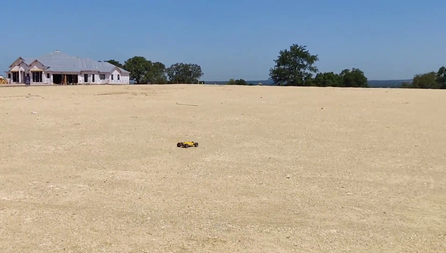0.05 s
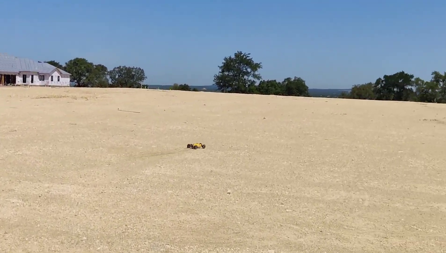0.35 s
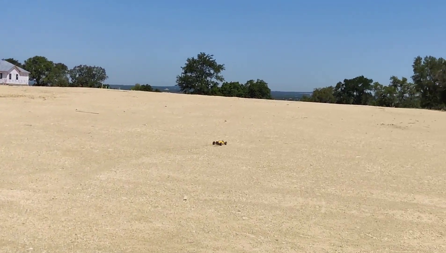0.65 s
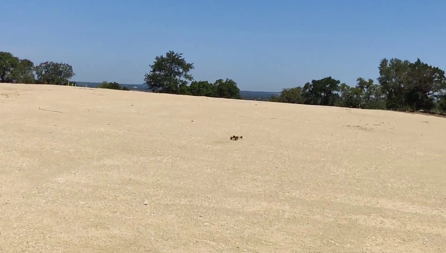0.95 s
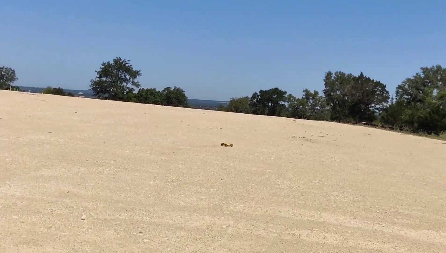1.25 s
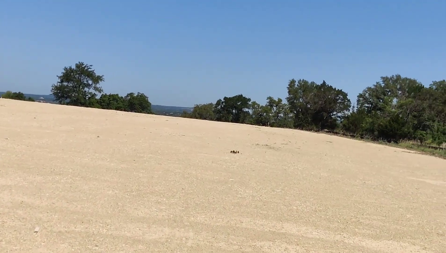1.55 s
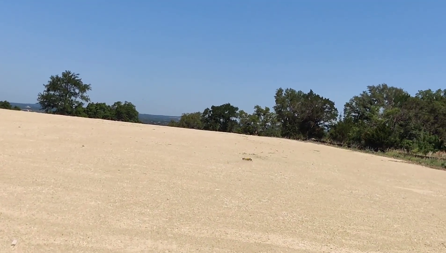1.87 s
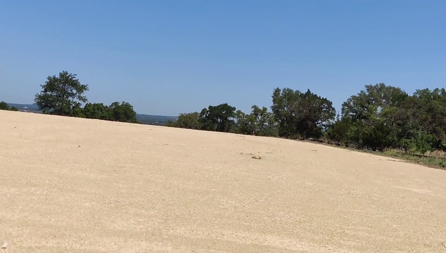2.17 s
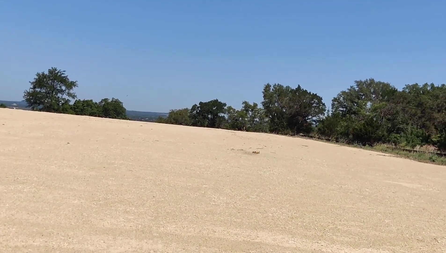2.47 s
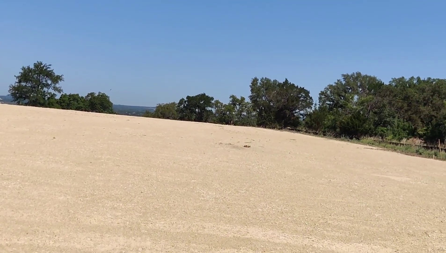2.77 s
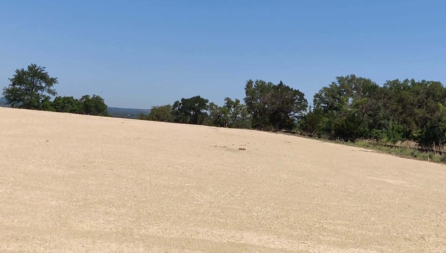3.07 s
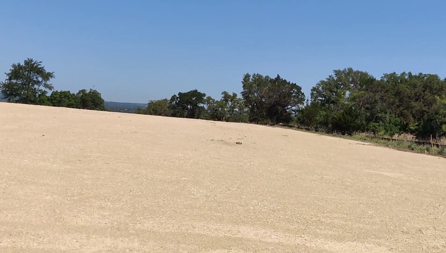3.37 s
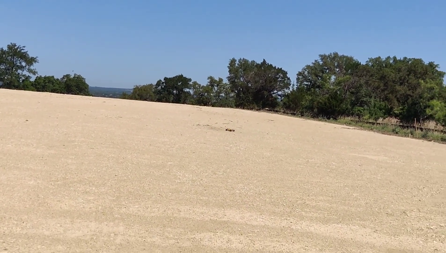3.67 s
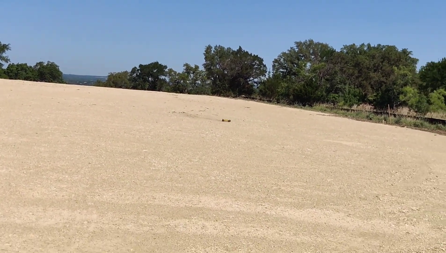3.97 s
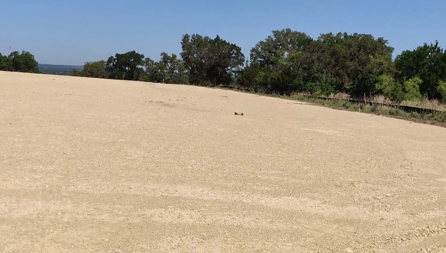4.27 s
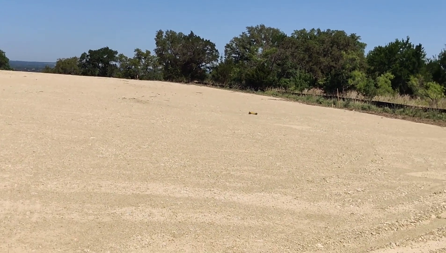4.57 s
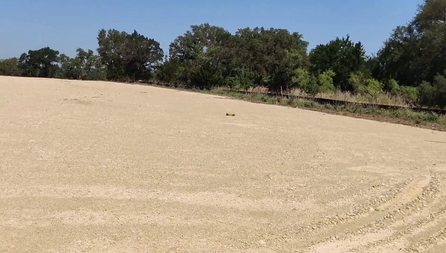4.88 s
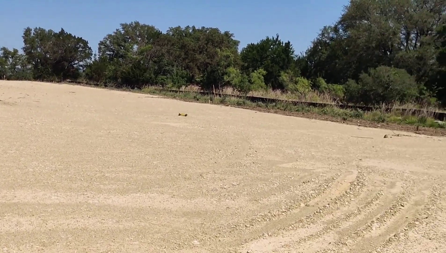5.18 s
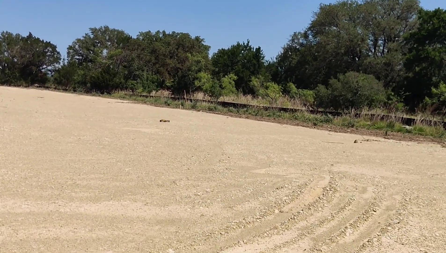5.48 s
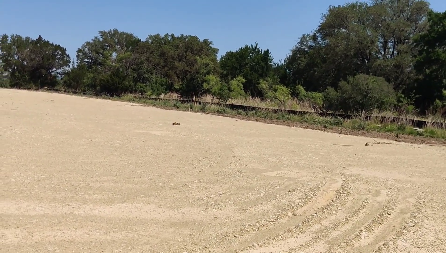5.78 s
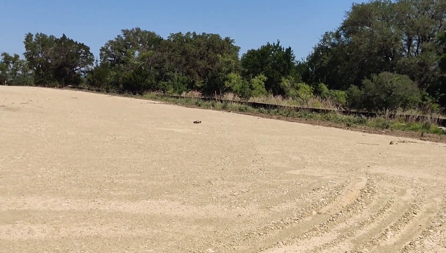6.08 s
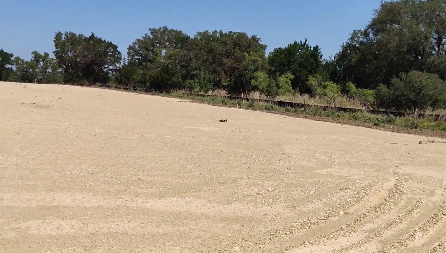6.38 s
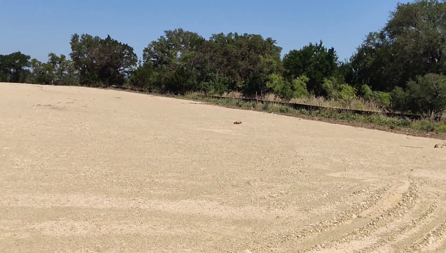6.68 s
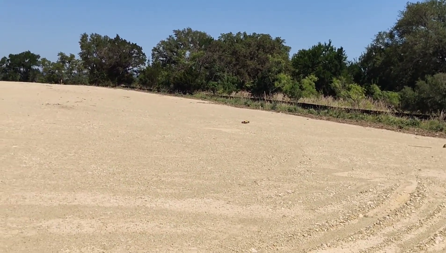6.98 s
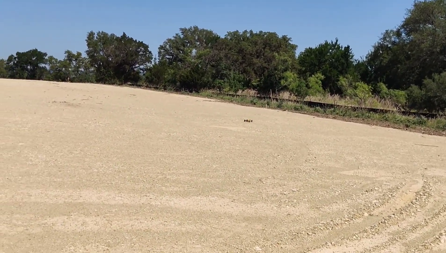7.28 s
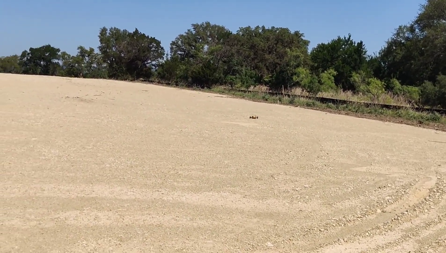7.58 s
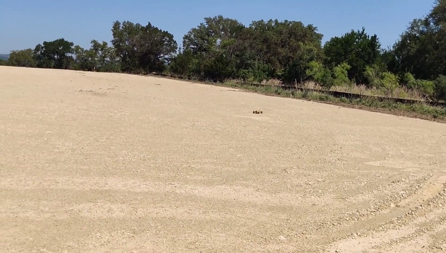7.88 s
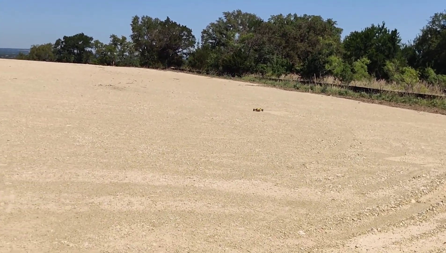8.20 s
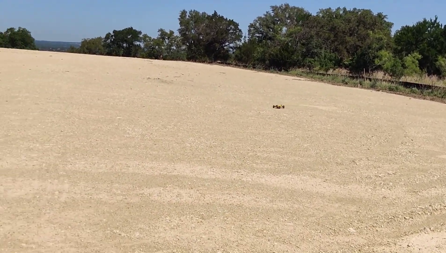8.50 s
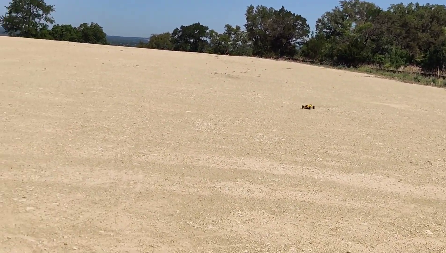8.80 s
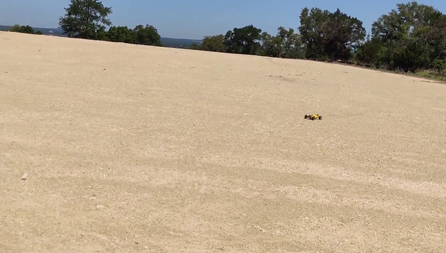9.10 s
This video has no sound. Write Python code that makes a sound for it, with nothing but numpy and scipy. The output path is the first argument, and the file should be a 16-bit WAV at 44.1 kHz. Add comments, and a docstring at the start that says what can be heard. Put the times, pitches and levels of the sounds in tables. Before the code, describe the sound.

Outdoors, wind buffets the microphone and a distant engine hums while a little electric toy car grinds over loose gravel. Sand hisses and stones tick at first, mixed with drivetrain chatter, then the car recedes into quieter spurts and soft scuffs. A loud, sharp clack stands out around the middle. After a lull and three faint bird chirps, the tyres crunch steadily louder as the car returns.

```python
"""A small electric toy car drives off over a gravel lot and comes back. From the start its tyres grind
stones in long swells and short spurts, its drivetrain chatters with speed and its colour shifts with
its bearing; wind rumbles on the microphone ports and a far engine swells in. Sand fizzes for the first
second or so; stones snap free and dull scuffs fall. From 2 s come sharp clacks, loudest at 5 s.
Near 7 s a far bird chirps three times, then the grinding builds again."""
import sys
import numpy as np
from scipy import signal
from scipy.fft import rfft, irfft, next_fast_len
from scipy.io import wavfile
from scipy.ndimage import uniform_filter1d, map_coordinates

SR = 44100
rng = np.random.default_rng(int(sys.argv[2]) if len(sys.argv) > 2 else 0)


def dump(signal):
    """Clip the signal to [-1, 1] and save it as 16-bit WAV at the path in sys.argv[1]."""
    limited = np.clip(np.atleast_2d(signal).T, -1, 1)
    pcm = np.round(limited * 32767).astype(np.int16)
    wavfile.write(sys.argv[1], SR, pcm)


N = 407904

# Tyre grinds. Each row: start of hold in seconds, attack, hold and release in seconds, relative crunch
# level in dB, change over the hold in dB, body and grit over crunch in dB.
TYRE_GRINDS = [(.01, 0.096, 0.14, 0.29, -44.5, -3.5, -2.5, 7.5),
               (0.29, 0.34, 0.52, 0.39, -31, -5.5, -10, 6.5), (1.067, 1, 0.23, 0.14, -37.5, -3, -5, 5),
               (1.405, 0.059, 0.097, 0.099, -50, -6, 1, -6.5),
               (1.505, 0.051, 0.036, 0.062, -47, 1, -8, 2.5), (1.634, 0.062, 0.5, 0.4, -47, -7, 0, 0.5),
               (2.247, 0.11, 0.31, 0.17, -58, -1.5, -1, 0.5), (2.619, 0.048, 0.027, 0.1, -56, -1, -4, 2.5),
               (2.713, 0.02, 0.015, 0.019, -54, -0.5, -9, 3),
               (2.767, 0.016, 0.024, 0.16, -57, -1.5, -6.5, 0.5),
               (2.95, 0.12, 0.026, 0.053, -56.5, 3.5, -17.5, 2),
               (3.021, 0.0084, 0.083, 0.037, -47.5, -0.5, -11.5, -1),
               (3.148, 0.018, 0.051, 0.086, -51, 2.5, -20, -0.5),
               (3.25, 0.13, 1.047, 0.2795, -43.5, -1.5, -10.5, 1.5),
               (4.444, 0.22, 0.047, 0.082, -52.5, -6, 2, -4.5),
               (4.549, 0.0095, 0.044, 0.04, -55, -1.5, -5, 1),
               (4.656, 0.029, 0.47, 0.37, -51, -5.5, -4, 1.5),
               (5.348, 0.21, 0.32, 0.12, -66.5, 0.5, -2, -3),
               (5.931, 0.14, 0.035, 0.11, -52, 0.5, -14, 2.5),
               (6.099, 0.11, 0.034, 0.17, -64, -10.5, 0.5, 8),
               (7.16, 0.076, 0.14, 0.22, -42, 3, -14.5, -0.5),
               (7.751, 0.19, 1.435, 0.26, -42.5, 10.5, -14.5, 1)]
# Drivetrain. Each row: time in seconds, knocks per second, power weight against the loose stones.
DRIVETRAIN_KNOCKS = [(0, 60.5, 0.76), (.18, 76.5, 1), (.36, 113, 1), (.52, 116, 0.71), (1.25, 136, 0.42),
                     (1.7, 45, 0.42), (2.9, 38.5, 0.098), (3.25, 66.5, 0.18), (3.55, 79, 0.57),
                     (3.75, 60, 1.6), (4.05, 98, 0.8), (4.5, 59, 1.14), (5.3, 42, 0.11), (7.05, 46.7, 0.37),
                     (7.3, 78, 0.95), (7.5, 49.3, 1.1), (7.85, 57, 1.3), (8.15, 62, 2.2), (8.35, 66, 1.09),
                     (8.55, 91, 0.66), (8.9, 112, 0.75), (9.25, 117, 0.43)]
# Noise colours. Each row: frequency in Hz, relative density in dB.
GRAVEL_SPECTRUM = [(150, -3.5), (300, -4), (600, -4), (1000, -5.5), (1350, -2.5), (2000, -2.5),
                   (3000, -1.5), (4000, 4), (5000, 6), (7000, 1), (10500, 1), (12000, -20), (13500, -0.5),
                   (15200, -14.5)]
SAND_SPECTRUM = [(6000, -48), (10500, -9), (13200, -12.5), (14300, -3.5), (15400, 3.5), (16500, -7.5)]
WIND_SPECTRUM = [(12, -5), (25, 1.5), (45, -0.5), (70, -4.5), (100, -10), (140, -19), (200, -27),
                 (300, -33.5), (450, -51), (900, -68)]
AIR_SPECTRUM = [(200, -1.5), (450, 0.5), (800, 5), (1500, -3.5), (3500, -8), (7200, -18), (14500, -19)]
# Gravel width. Each row: frequency in Hz, left-right correlation.
GRAVEL_CORRELATION = [(300, 0.99), (1500, 0.92), (2700, 1), (4500, 0.84), (6000, 0.64), (8000, 0.63),
                      (15000, 1)]
# Hollow rasp of a heavy grind. Each row: low edge in Hz, high edge in Hz, gain added at full strength.
RASP_BANDS = [(1430, 1804, 0.67), (5740, 7300, 0.19)]
# Side of the car facing the listener. Each row: time in seconds, shares of tail, flank and nose.
SHELL_FACING = [(0, 0.82, 0.46, 0), (1.2, 0.81, 0.29, 0.24), (1.8, 0.4, 0.12, 0), (3.3, 0.34, 0.14, 0.91),
                (3.6, 0.014, 0.97, 0.47), (4.4, 0.036, 1, 0.018), (5.2, 0.21, 0.22, 0.19), (7, 0, 0, 1),
                (7.8, 0, 0.037, 0.94), (8.5, 0, 0.059, 0.83), (9.25, 0.35, 0.059, 0.72)]
# Plastic shell resonances and dips, by side. Each row: centre in Hz, width in Hz, gain in dB.
TAIL_PEAKS = [(2007, 184.8, 8), (2500, 191.0, 3.5), (3480, 174.3, 3.2), (5790, 347.7, 6.4),
              (8384.6, 114.4, 1.5)]
FLANK_PEAKS = [(1040, 500, 5.3), (2160, 125.0, 3.9), (4460, 600, 1.5), (5150, 339.3, 4.3), (6470, 210, 3.5)]
NOSE_PEAKS = [(2900, 250, 4.5), (5030, 470, 4.5), (5146.7, 1400, 0.6), (5300, 210, -9), (7140, 290, -3)]
# Sand spray. Each row: time in seconds, level in dB.
SAND_LEVELS = [(0, -55), (.15, -41), (.35, -39.5), (.6, -53.5), (.9, -44), (1.3, -66), (1.7, -92)]
# Gusts. Each row: time of the top in seconds, length in seconds, relative level in dB.
WIND_GUSTS = [(.25, 0.28, -38), (0.395, 0.19, -32.5), (2.47, 0.048, -38), (3.006, 0.19, -36),
              (3.849, 0.22, -41.5), (4.098, 0.042, -36), (4.99, 0.15, -42.5), (5.563, 0.2, -39),
              (6.039, 0.23, -38.5), (8.357, 0.09, -32), (8.544, 0.11, -34), (9.09, 0.14, -35.5)]
# Far engine. Each row: multiple of the turning rate, level in dB.
ENGINE_HARMONICS = [(4, -56), (5, -54.5), (6, -66.5), (7, -66.5), (8, -67), (10, -71.5)]
# Larger stones snapping free. Each row: start in seconds, relative peak in dB.
STONE_SNAPS = [(0.074, -22.5), (0.104, -19), (0.135, -21), (0.148, -20), (0.262, -15), (0.3403, -14.5),
               (0.367, -12), (0.3843, -14), (0.394, -12), (0.439, -12.5), (0.4794, -20.5), (0.5416, -15),
               (0.7586, -19.5), (1.06, -14), (1.1275, -11.5), (1.3215, -17), (1.42, -28.5), (1.4531, -21),
               (1.464, -21), (1.5055, -24), (1.517, -23), (1.5368, -25), (1.6245, -27.5), (1.647, -31.5),
               (1.8775, -33.5), (1.9511, -26.5), (2.1436, -44.5), (2.345, -42), (2.431, -41.5),
               (2.475, -36), (2.7125, -38), (2.7255, -32.5), (3.024, -31), (3.246, -31), (4.277, -25),
               (4.464, -31.5), (4.481, -39.5), (4.5523, -34.5), (4.573, -39), (4.644, -36), (4.69, -27.5),
               (5.58, -45), (5.622, -43.5), (5.693, -43.5), (5.8046, -41), (5.8115, -40.5), (5.865, -45.5),
               (5.926, -26.5), (5.9323, -30), (5.979, -26), (5.985, -30), (7.0492, -39.5), (7.1703, -29.5),
               (7.3758, -30.5), (7.433, -36.5), (7.472, -39.5), (7.509, -41), (7.554, -43), (7.6, -35.5),
               (7.7967, -24.5), (8.0767, -20.5), (8.279, -24.5)]
# Scuffs in the dirt. Each row: start in seconds, peak before panning in dB, pitch in Hz.
DIRT_SCUFFS = [(0.128, -32.5, 580), (0.145, -33, 590), (2.06, -40.5, 580), (2.297, -46, 917),
               (2.438, -40, 701), (2.449, -40, 877), (2.49, -37.5, 720), (2.783, -48, 960),
               (3.048, -37.5, 760), (3.133, -47, 603), (3.199, -43, 750), (3.434, -32.5, 576),
               (3.4398, -32, 691), (3.4445, -33, 801), (3.45, -35, 510), (3.459, -25, 705),
               (3.463, -33, 616), (5.096, -36.5, 700)]
# Near clacks. Each row: start in seconds, peak before panning in dB, treble and bass weights in dB,
# rub T60 in seconds, pitch ratio.
CLACK_HITS = [(2.146, -35, -34, -25.5, .006, 0.98), (3.1322, -34, -22, -10, 0.0079, 1),
              (3.246, -30.5, -25, -34, .012, 0.94), (4.836, -27, -14, -23, 0.012, 0.91),
              (5.0168, -12, 5, -12, 0.036, 1.015), (5.027, -16, -12.5, -11.5, 0.047, 1),
              (5.032, -18, -6, -10.5, 0.073, 1.07), (5.2057, -28, -13.5, -5.5, 0.033, 0.99),
              (5.256, -34, -4, -2, 0.0047, 1.03), (5.313, -38.5, -26.5, -21, 0.0067, 0.91),
              (6.381, -46.5, -10, -10, 0.099, 1), (6.396, -32.5, -43, -8, 0.038, 1.05),
              (6.406, -36.5, -15, -4, 0.049, 0.93), (6.414, -42, -24, -4, 0.07, 1.05),
              (6.423, -39, -18, 5, 0.047, 0.89)]
# Modes of a clack. Each row: frequency in Hz, relative level in dB, T60 in seconds.
CLACK_RESONANCES = [(818.4, -3, 0.022), (1051, -13, 0.041), (1410, -14.5, 0.0129), (1859, -9.5, 0.01702),
                    (2241, -7, 0.015), (2750, -2.5, 0.0082), (3638, -9.5, 0.019), (4243, 6, 0.0099),
                    (6370, 0.5, 0.016), (7640, -1, 0.0051), (9200, -1.5, 0.0022)]
# Far bird. Each row: mid-note time in seconds, pitch in Hz, peak in dB.
BIRD_CHIRPS = [(6.821, 4040, -70.5), (6.921, 4050, -72.5), (7.03, 4100, -69.5)]
# Microphone casing and port resonances and dips. Each row: centre in Hz, width in Hz, gain in dB.
CASING_PEAKS = [(656, 180, 3.5), (1000, 160, -0.5), (1220, 130, 1), (1340, 150, -5), (1660, 200, 1),
                (1940, 250, -3), (2276, 135, 6), (2800, 67, 1.5), (4200, 150, 1.5), (4410, 770, -4),
                (5930, 200, 1.5), (6230, 220, 0), (6400, 180, 0.5)]
LEFT_PORT_PEAKS = [(300.1, 4200, -3), (1684, 770, 5.5), (4250, 1260, 6), (6740, 1200, -23.5),
                   (7580, 1660, 13.5)]
RIGHT_PORT_PEAKS = [(1692, 380, 4), (2420, 1920, -4), (6568.7, 2100, 15.5), (8215, 3350, -17.5)]
# Car's bearing at the ports. Each row: time in seconds, left lag in samples, left dip in Hz,
# reflection delay in seconds.
BEARING_CUES = [(0.25, -1.5, 4119.39, 0.0022), (0.575, -3.5, 4032.49, 0.0018), (1.025, 0.6, 4000, 0.002),
                (1.95, -0.36, 3940, 0.0018), (3.525, 0.6, 3894, 0.0016), (4.1, -0.8, 3800, 0.0019),
                (4.8, 0.65, 3945, 0.0017), (7.275, 1.4, 3788, 0.0017), (8.0, 1.8, 3686, 0.0018),
                (8.425, 2.5, 3590, 0.0018), (8.75, 4.5, 3498, 0.0019), (9.05, 5, 3474, 0.0019)]
# Reflections off a near surface on the right. Each row: share of the reflection delay, gain.
REFLECTIONS = [(1, .19), (0.674, 0.059)]


def from_db(db):
    """Decibels to gain."""
    return 10 ** (np.asarray(db) / 20)


def unit_rms(x):
    """Scale to unit power."""
    return x / np.sqrt(np.mean(x ** 2) + 1e-20)


def pan_right(x, db):
    """Left down and right up, each by db."""
    return x * from_db([[-db], [db]])


def add(out, start_s, sound):
    """Mix a sound in at a time."""
    i = int(start_s * SR)
    out[..., i:i + sound.shape[-1]] += sound[..., :N - i]


def in_time(rows):
    """Each column of a timed table, per sample."""
    times_s, *columns = np.transpose(rows)
    return [np.interp(np.arange(N) / SR, times_s, column) for column in columns]


def at_hz(points, hz):
    """Interpolate on a log-frequency axis."""
    points_hz, values = np.transpose(points)
    return np.interp(np.log(hz), np.log(points_hz), values)


def drift(knots_per_s):
    """Random wander between knots of spread 1."""
    knots = rng.standard_normal(4000)
    return np.interp(np.arange(N) / SR * knots_per_s, np.arange(len(knots)), knots)


def band(x, low_hz, high_hz):
    """Band-pass."""
    return signal.sosfilt(signal.butter(2, [low_hz, high_hz], "band", fs=SR, output="sos"), x)


def decay(clicks, t60_s):
    """Exponential tail on each click."""
    return signal.lfilter([1], [1, -from_db(-60 / (t60_s * SR))], clicks + 1e-18)


def ring(x, hz, t60_s):
    """One damped mode."""
    r, w = from_db(-60 / (t60_s * SR)), 2 * np.pi * hz / SR
    return signal.lfilter([0, np.sin(w)], [1, -2 * r * np.cos(w), r * r], x + 1e-18)


def peak_filter(hz, width_hz, db):
    """Biquad for one peak or dip."""
    w, a = 2 * np.pi * hz / SR, from_db(db / 2)
    q = np.sin(w) * width_hz / hz / 2
    return [1 + q * a, -2 * np.cos(w), 1 - q * a], [1 + q / a, -2 * np.cos(w), 1 - q / a]


def resonate(x, peaks):
    """Peaks and dips in series."""
    for peak in peaks:
        x = signal.lfilter(*peak_filter(*peak), x)
    return x


def stereo(noises, correlation):
    """Two noises mixed to a correlated left and right."""
    mid = np.sqrt(1 + correlation) * noises[0]
    side = np.sqrt(1 - correlation) * noises[1]
    return np.array([mid + side, mid - side]) / np.sqrt(2)


def steady_noise(spectrum, correlation):
    """Unit-power stereo noise; colour and correlation are given by frequency."""
    size = next_fast_len(N)
    hz = np.arange(size // 2 + 1) * SR / size + 0.00104
    white = rfft(rng.standard_normal((2, size)))
    coloured = stereo(white, at_hz(correlation, hz)) * from_db(at_hz(spectrum, hz))
    return unit_rms(irfft(coloured, size)[:, :N])


def grind_levels_db(edge_db=20, dig_body_db=7, dig_grit_db=2.5, spurts_below_db=-46):
    """Body, crunch and grit: each grind builds, digs in and lets go; light loads move in spurts."""
    t, power = np.arange(N) / SR, 1e-12
    for start_s, attack_s, hold_s, release_s, db, change_db, body_db, grit_db in TYRE_GRINDS:
        progress = np.clip((t - start_s) / hold_s, 0, 1)
        edges = np.maximum(start_s - t, 0) / attack_s + np.maximum(t - start_s - hold_s, 0) / release_s
        crunch_db = db + change_db * progress - edge_db * np.minimum(edges, 10)
        dig = progress - .5
        power = power + from_db([crunch_db + body_db + dig_body_db * dig,
                                 crunch_db,
                                 crunch_db + grit_db + dig_grit_db * dig]) ** 2
    levels_db = 10 * np.log10(power)
    spurt_db = 0.23 * np.clip(spurts_below_db - levels_db[1], 0, 20)
    return levels_db + spurt_db * drift(19)


def drivetrain_chatter(slips_per_s, weight=0.42, spread_db=1.7, rattle_s=.001, touches=4):
    """Energy per sample of the short rattle at each turn of the drivetrain."""
    knocks_per_s, power = in_time(DRIVETRAIN_KNOCKS)
    turns = np.flatnonzero(np.diff(np.floor(np.cumsum(knocks_per_s) / SR)))
    energy = weight * (power * slips_per_s / knocks_per_s)[turns]
    energy *= from_db(spread_db * rng.standard_normal(N)[turns]) ** 2
    jitter = SR * rattle_s * rng.standard_normal((len(turns), touches))
    onsets = np.clip(turns[:, None] + jitter, 0, N - 1).astype(int)
    return np.bincount(onsets.ravel(), np.repeat(energy, touches), N)


def stone_slips(slips_per_s, clump_db=2.5, spread_db=3.0):
    """Energy per sample of loose stones slipping in random clumps."""
    slipped = rng.random(N) < slips_per_s * from_db(clump_db * np.minimum(drift(45), 1)) / SR
    return slipped * from_db(spread_db * np.minimum(rng.exponential(1, N), 2.5)) ** 2


def rasp(x, crunch_db, onset_db=-40, span_db=3):
    """Heavy grinding brings out hollow bands."""
    strength = np.clip((crunch_db - onset_db) / span_db, 0, 1)
    return x + strength * sum(gain * band(x, low_hz, high_hz) for low_hz, high_hz, gain in RASP_BANDS)


def shell(x):
    """The car's shell colours the sound by the side it turns to the listener."""
    sides = zip(in_time(SHELL_FACING), (TAIL_PEAKS, FLANK_PEAKS, NOSE_PEAKS))
    return x + sum(share * (resonate(x, peaks) - x) for share, peaks in sides)


def gravel(slip_t60_s=0.019, sand_share=0.34, tint_db=9.5, trims_db=(-.5, -3.0, -2.5)):
    """Each slip is a tiny burst of fractures with its own colour, over a hiss of sand."""
    body_db, crunch_db, grit_db = grind_levels_db()
    slips_per_s = 760 * from_db(.4 * (grit_db - grit_db.max()))
    slips = stone_slips(slips_per_s) + drivetrain_chatter(slips_per_s)
    onsets = np.flatnonzero(slips)
    # Stones slipping together share the power set by the load.
    local_energy = uniform_filter1d(decay(slips, slip_t60_s / 2), size=3000) + 0.22
    shares = slips[onsets] / local_energy[onsets]
    edges_hz = np.geomspace(150, 16500, 21)
    centres_hz = np.sqrt(edges_hz[1:] * edges_hz[:-1])
    powers = from_db(at_hz(GRAVEL_SPECTRUM, centres_hz)) ** 2 * np.diff(edges_hz)
    zones_hz = [(400, 1300), (1400, 3400), (4000, 11000)]  # big stones, small stones, grit
    zone_gains = [from_db(db + trim_db) / np.sqrt(powers[(centres_hz > low) & (centres_hz < high)].sum())
                  for db, trim_db, (low, high) in zip((body_db, crunch_db, grit_db), trims_db, zones_hz)]
    white, out = rng.standard_normal((2, 2, N)), 0
    tints = from_db(tint_db * rng.uniform(-1.3, 1, (len(onsets), len(centres_hz)))) ** 2
    tints /= tints.mean()
    for k, hz in enumerate(centres_hz):
        zone = at_hz([(1000, 0), (1650, 1), (2800, 1), (5000, 2)], hz)
        gain = sum(g * max(0, 1 - abs(zone - j)) for j, g in enumerate(zone_gains))
        grain_power = decay(np.bincount(onsets, shares * tints[:, k], N), slip_t60_s / 2)
        envelope = gain * np.sqrt((grain_power + sand_share) * SR / 2)
        bursts = envelope * stereo(white[k % 2], at_hz(GRAVEL_CORRELATION, hz))
        out = out + from_db(at_hz(GRAVEL_SPECTRUM, hz)) * band(bursts, edges_hz[k], edges_hz[k + 1])
    return shell(rasp(out, crunch_db))


def sand_spray(flutter_db=4.5):
    """Fine sand fizzes in the top treble."""
    level_db = in_time(SAND_LEVELS)[0] + flutter_db * drift(250)
    return from_db(level_db) * steady_noise(SAND_SPECTRUM, [(300, 0.23), (15000, .2)])


def wind(breeze_db=-41.5, waver_db=1.3, gain_db=2.5):
    """Eddies buffet each port: a wavering breeze plus bell-shaped gusts."""
    t = np.arange(N) / SR
    rumble = steady_noise(WIND_SPECTRUM, [(30, 0.171), (70, 0.75), (140, 0.66), (300, 0.21)])
    breeze_power = from_db(breeze_db - waver_db * drift(7.4)) ** 2
    gust_power = sum(from_db(db) ** 2 * np.exp(-(2 * (t - top_s) / length_s) ** 2)
                     for top_s, length_s, db in WIND_GUSTS)
    return pan_right(from_db(gain_db) * np.sqrt(breeze_power + gust_power) * rumble, db=2.5)


def far_engine(turn_hz=31.85, speed_waver=.0015, waver_db=2.0, swell_s=2.1, swell_db=7):
    """A drone swells in and holds; its partials waver on the way through the air."""
    turns = np.cumsum(turn_hz * (1 + speed_waver * drift(1.976))) / SR
    drone = sum(from_db(db + waver_db * drift(4)) * np.sin(2 * np.pi * (k * turns + rng.random()))
                for k, db in ENGINE_HARMONICS)
    swell = from_db(swell_db * np.minimum(np.arange(N) / SR / swell_s - 1, 0))
    return pan_right(np.sqrt(2) * swell * drone, db=1.6)


def open_air(level_db=-64.0):
    """Faint, wide, steady hush."""
    return from_db(level_db) * steady_noise(AIR_SPECTRUM, [(300, 0.6), (1500, 0.08), (5000, 0.047)])


def contact(t60_s, roughness):
    """One rough touch: a click and a short rub, of unit energy."""
    t = np.arange(4000) / SR
    touch = (t == 0) + roughness * rng.standard_normal(len(t)) * from_db(-60 * t / t60_s)
    return touch / np.sqrt(np.sum(touch ** 2))


def stone_snaps(stone_hz=4900, pitch_spread=.13, ring_gain=0.38):
    """A stone jumps free with a broad tick and rings briefly at its own pitch."""
    out = np.zeros((2, N))
    for start_s, db in STONE_SNAPS:
        touch = contact(t60_s=.014, roughness=2)
        hz = stone_hz * np.exp(pitch_spread * rng.uniform(-2.2, 2.07))
        tick = unit_rms(band(touch, 2500, 7500)) + ring_gain * unit_rms(ring(touch, hz, t60_s=.007))
        add(out, start_s, from_db(db) * tick / np.abs(tick).max())
    return out


def scuffs(t60_s=0.023):
    """Soft blows in the dirt ring briefly and low."""
    out = np.zeros(N)
    for start_s, db, hz in DIRT_SCUFFS:
        low_mode = ring(contact(0.048, 0.069), hz, t60_s)
        high_mode = ring(contact(0.012, 0.016), hz * 1.33, t60_s / 2)
        knock = band(low_mode + 0.27 * high_mode, 280, 2700)
        add(out, start_s, from_db(db) * knock / np.abs(knock).max())
    return pan_right(out, db=3.0)


def clacks(treble_ref_db=-4.0, bass_ref_db=-9.0, detune=0.0094):
    """Rough touches ring one set of modes; sharp ones favour the high modes, heavy ones the low."""
    out = np.zeros((2, N))
    for start_s, db, treble_db, bass_db, rub_t60_s, pitch_ratio in CLACK_HITS:
        clack = 0
        for hz, mode_db, t60_s in CLACK_RESONANCES:
            treble = np.clip((hz - 2400) / 1500, 0, 1)
            bass = np.clip((1700 - hz) / 600, 0, 1)
            rub_s = rub_t60_s * (1 - .5 * treble)
            touch = contact(rub_s, 0.22) + treble * np.array([contact(rub_s, 1), contact(rub_s, 0.63)])
            mode = ring(touch, pitch_ratio * hz * (1 + detune * rng.standard_normal()), t60_s)
            weight_db = mode_db + treble * (treble_db - treble_ref_db) + bass * (bass_db - bass_ref_db)
            clack = clack + from_db(weight_db) * mode / np.abs(mode).max()
        clack = band(clack, 890, 18000)
        add(out, start_s, from_db(db) * clack / np.abs(clack.mean(axis=0)).max())
    return pan_right(out, db=3.0)


def bird(length_s=0.04, glide_hz=20):
    """Short, soft, nearly pure notes, each falling slightly."""
    out, progress = np.zeros(N), np.linspace(0, 1, int(length_s * SR))
    for middle_s, hz, db in BIRD_CHIRPS:
        phase = 2 * np.pi * np.cumsum(hz + glide_hz * np.cos(np.pi * progress)) / SR
        add(out, middle_s - length_s / 2, from_db(db) * np.sin(np.pi * progress) ** 2 * np.sin(phase))
    return out


def delayed(x, samples):
    """Fractional delay."""
    return map_coordinates(x, [np.arange(N) - samples], order=3)


def moving_dip(x, hz, width_hz, db, block=512):
    """A dip whose centre slides, block by block."""
    out, state = np.zeros(N), np.zeros(2)
    for i in range(0, N, block):
        b, a = peak_filter(hz[i], width_hz, db)
        out[i:i + block], state = signal.lfilter(b, a, x[i:i + block], zi=state)
    return out


def microphones(x):
    """Casing and ports colour the car; its bearing sets a lag and dip left, two reflections right."""
    lag_samples, dip_hz, echo_s = in_time(BEARING_CUES)
    left, right = resonate(x, CASING_PEAKS)
    left = moving_dip(resonate(left, LEFT_PORT_PEAKS), dip_hz, width_hz=424, db=-32.5)
    right = right + sum(gain * delayed(right, share * echo_s * SR) for share, gain in REFLECTIONS)
    return np.array([delayed(left, lag_samples), resonate(right, RIGHT_PORT_PEAKS)])


def scene(gravel_gain_db=-1.5):
    """Near gravel and knocks over air, wind, engine and bird."""
    background = open_air() + wind() + far_engine() + bird()
    knocks = scuffs() + clacks()
    sand = sand_spray()
    car = stone_snaps() + from_db(gravel_gain_db) * gravel()
    return background + knocks + sand + microphones(car)


def record(dry, cutoff_hz=15800):
    """Steep low-pass."""
    return signal.sosfilt(signal.ellip(10, .2, 80, cutoff_hz, fs=SR, output="sos"), dry)


dry = scene()
out = record(dry)
dump(out)
```